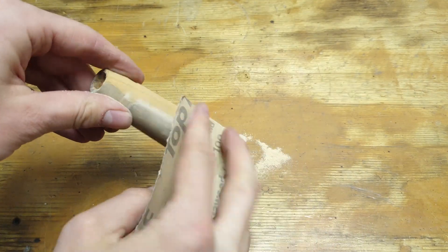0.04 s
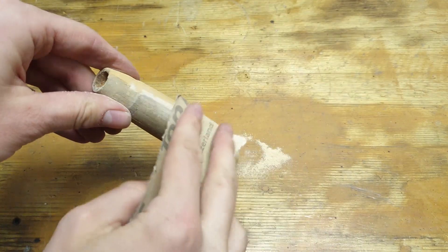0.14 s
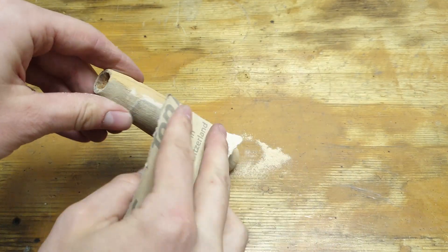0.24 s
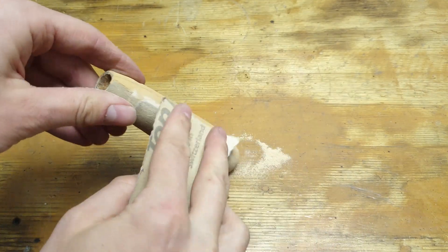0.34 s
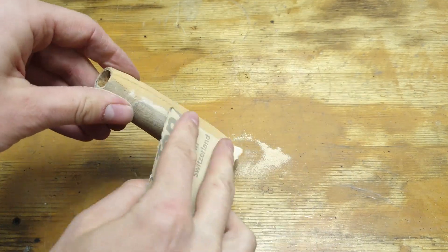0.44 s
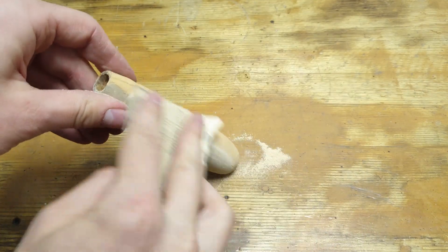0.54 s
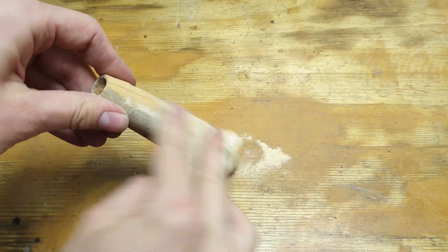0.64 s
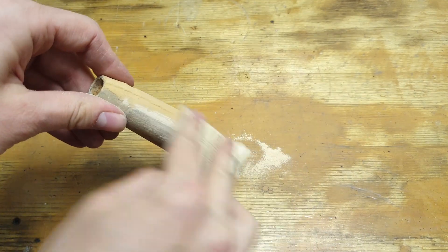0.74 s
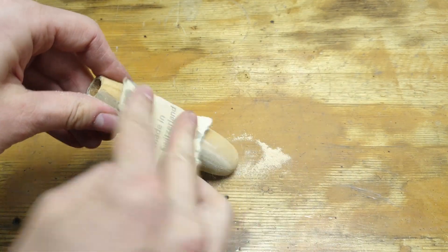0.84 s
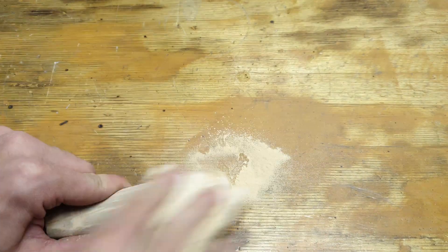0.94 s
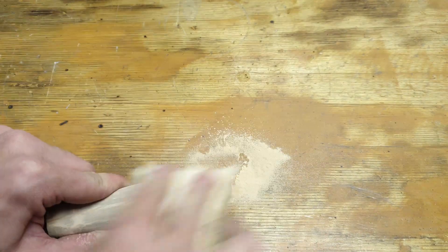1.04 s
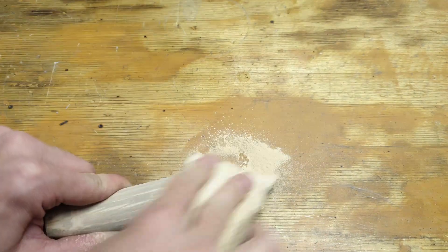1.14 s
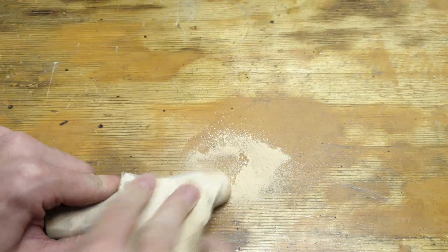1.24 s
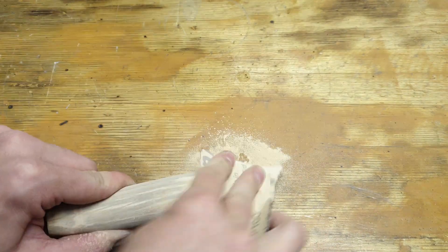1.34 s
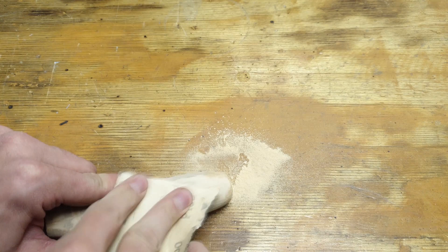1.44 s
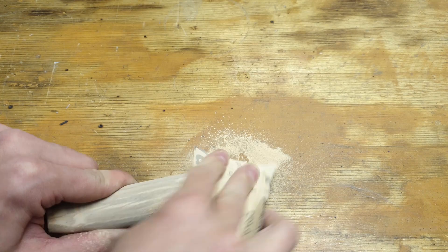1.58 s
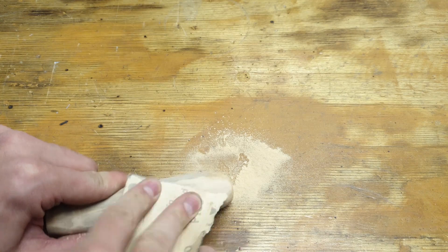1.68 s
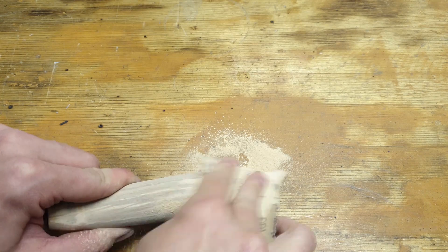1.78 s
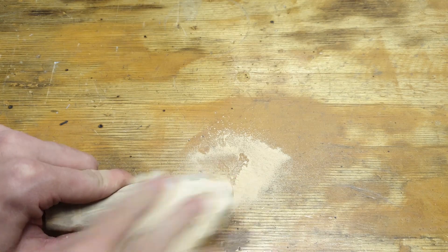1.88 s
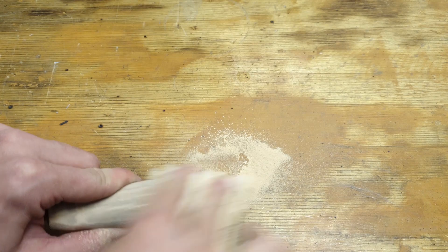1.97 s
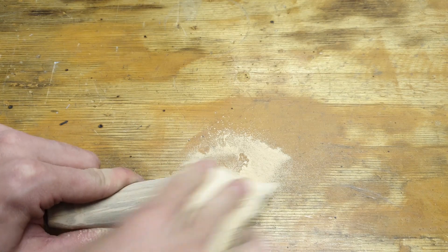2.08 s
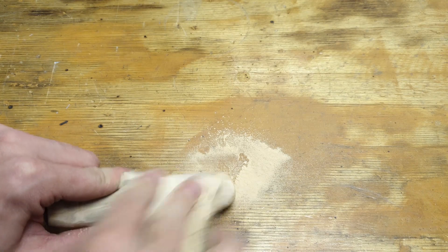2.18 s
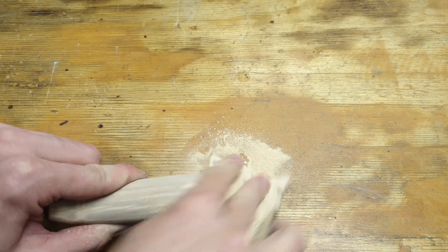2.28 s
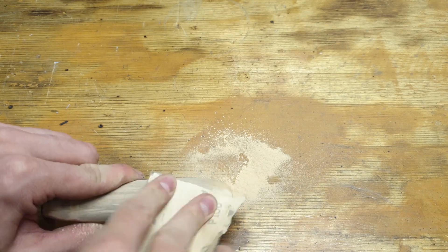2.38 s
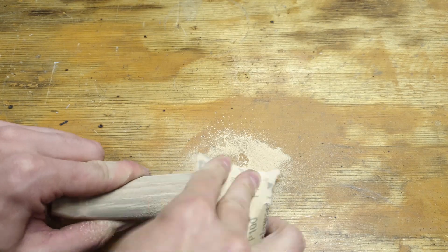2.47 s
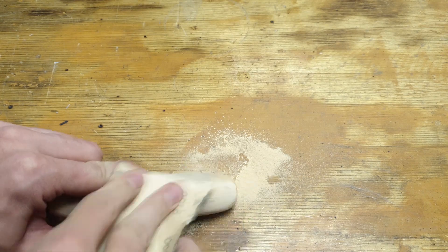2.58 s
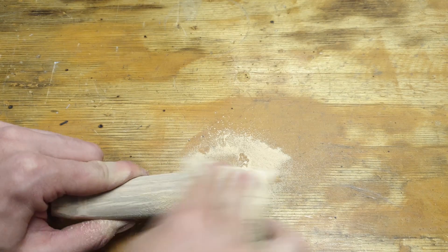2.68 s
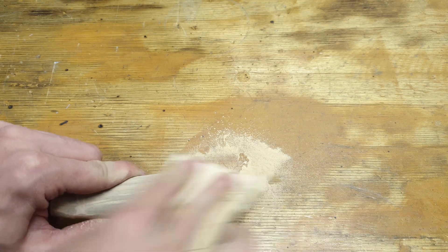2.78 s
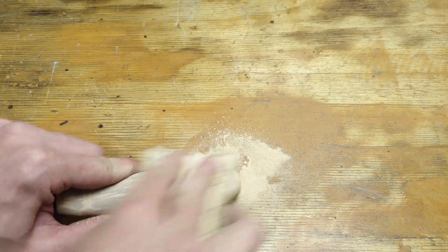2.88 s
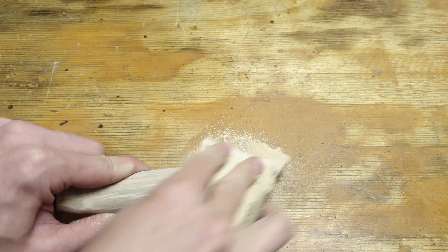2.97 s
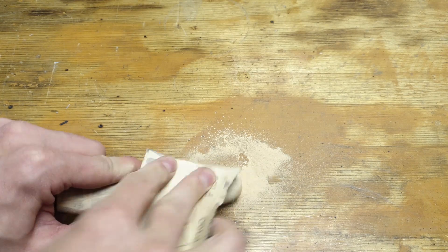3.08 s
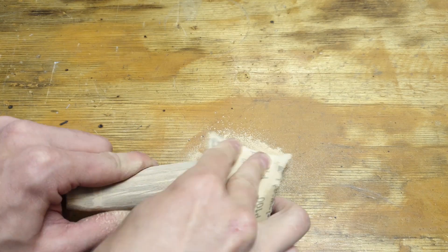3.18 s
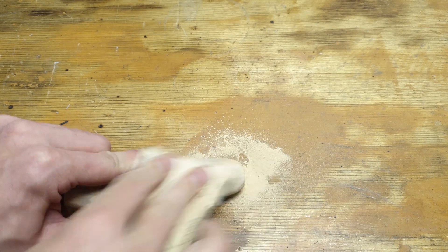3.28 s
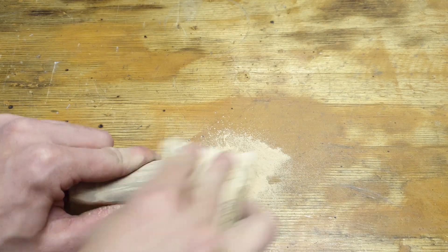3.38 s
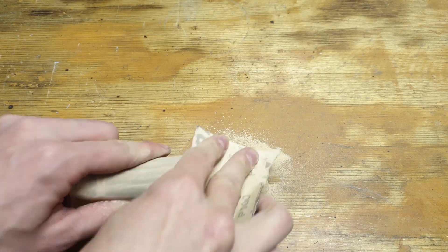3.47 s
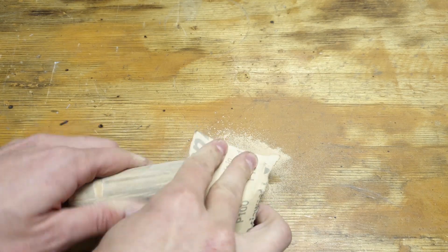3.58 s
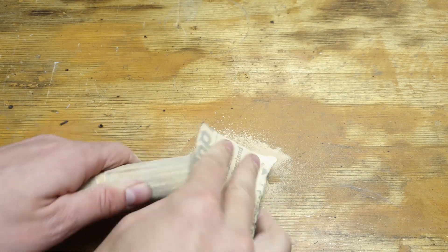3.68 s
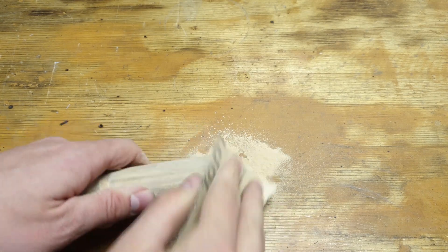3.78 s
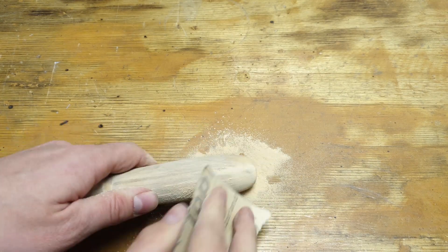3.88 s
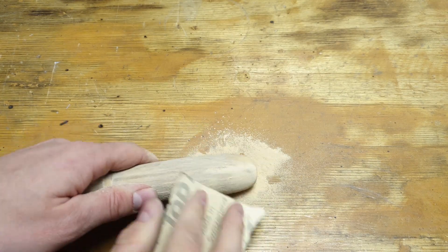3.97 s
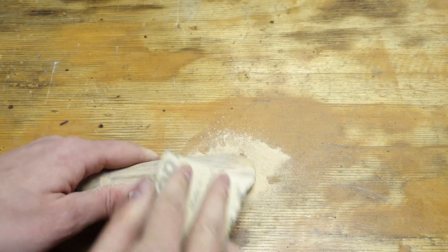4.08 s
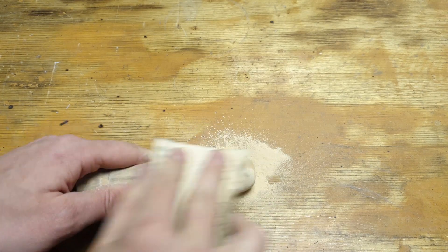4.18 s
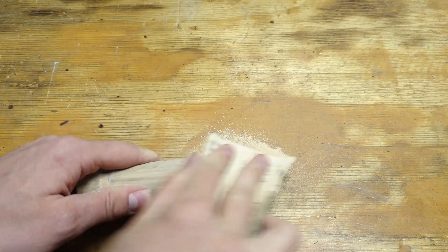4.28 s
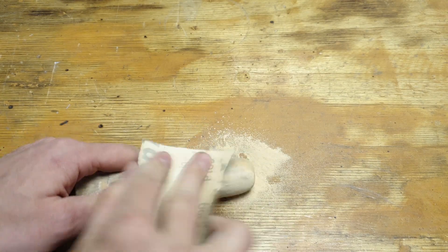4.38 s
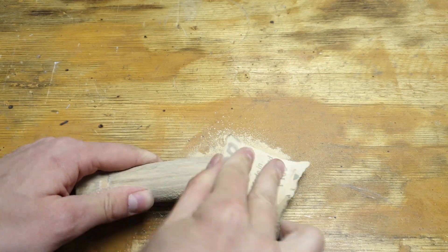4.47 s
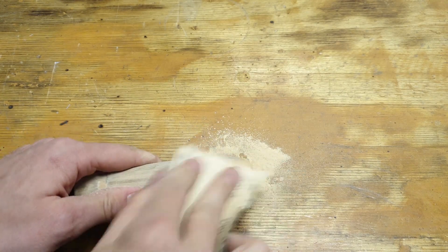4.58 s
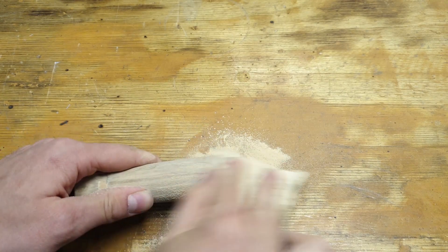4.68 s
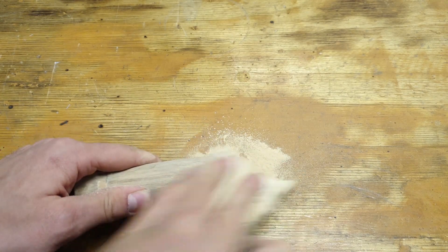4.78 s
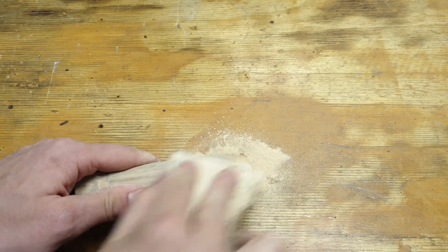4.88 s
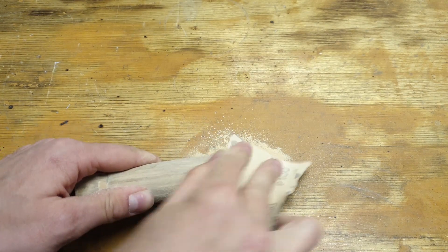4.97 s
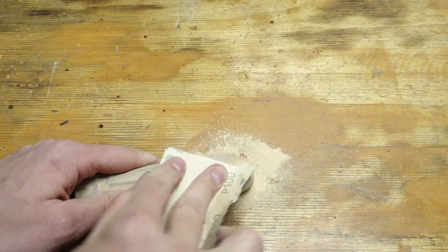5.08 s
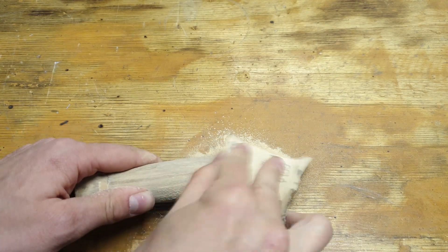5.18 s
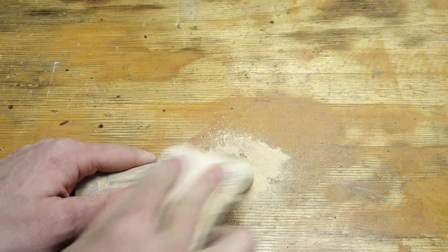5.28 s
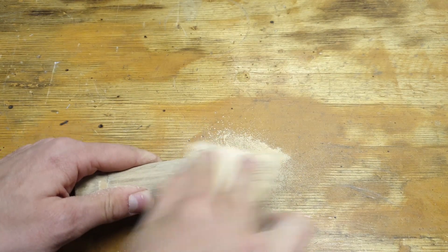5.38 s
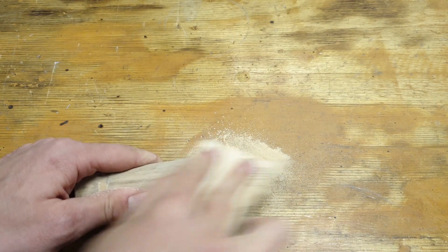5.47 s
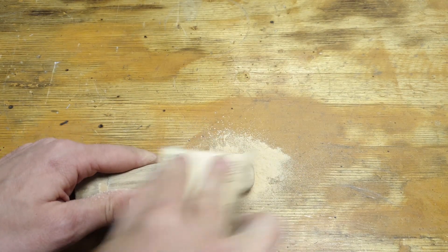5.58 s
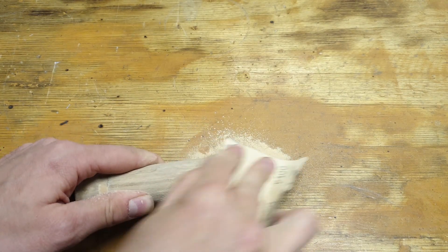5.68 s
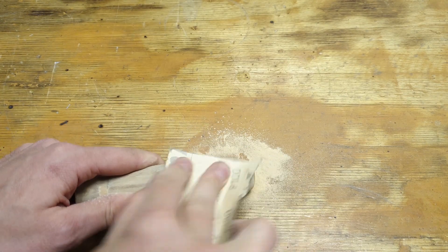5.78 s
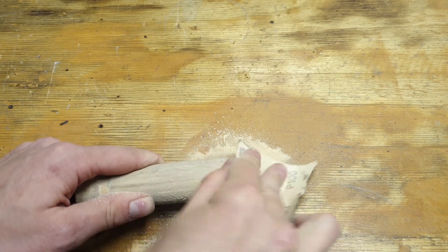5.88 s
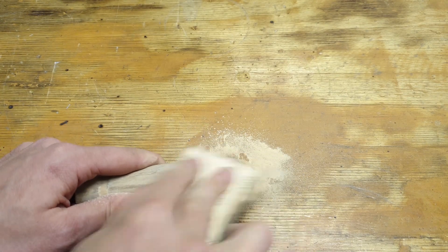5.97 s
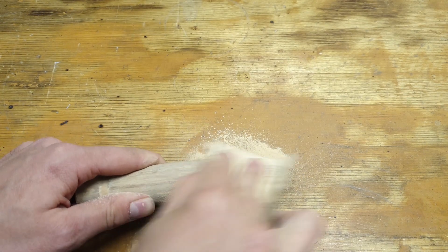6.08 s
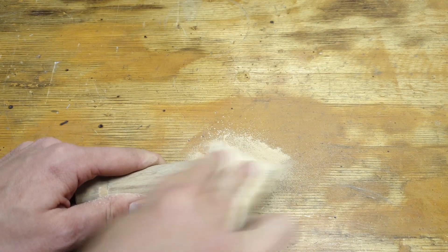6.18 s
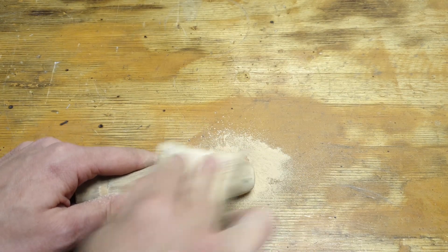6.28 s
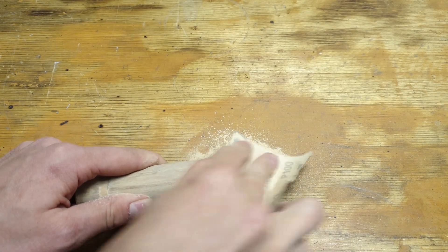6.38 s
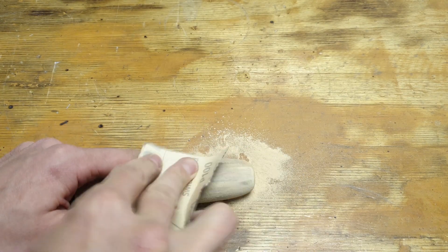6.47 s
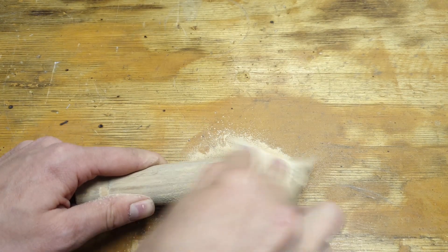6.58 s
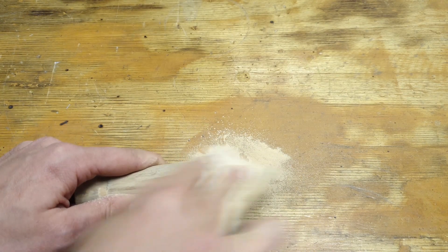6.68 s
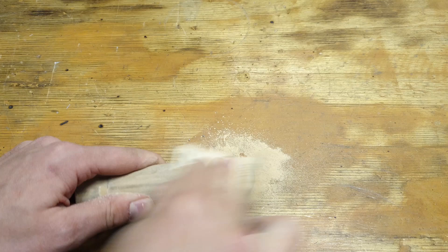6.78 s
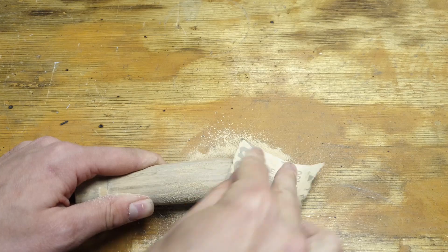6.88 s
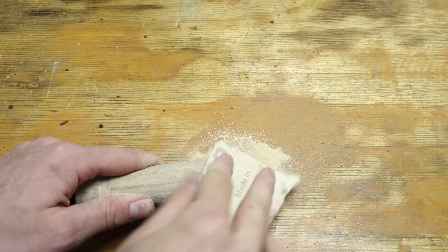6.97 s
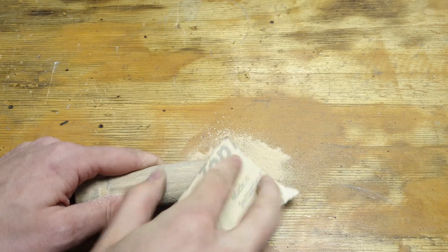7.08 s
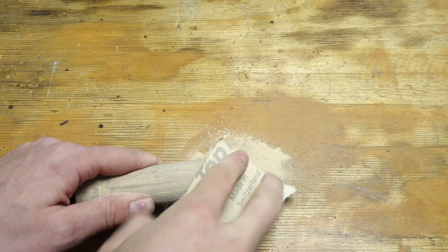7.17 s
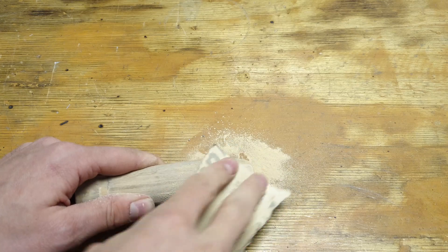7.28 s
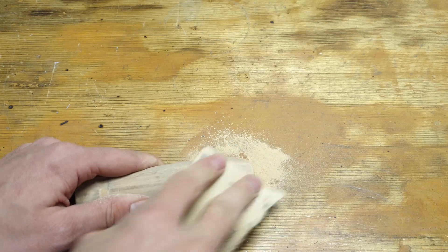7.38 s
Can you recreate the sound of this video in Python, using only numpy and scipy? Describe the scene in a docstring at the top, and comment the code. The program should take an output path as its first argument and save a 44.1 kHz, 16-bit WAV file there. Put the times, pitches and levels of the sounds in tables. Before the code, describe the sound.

Sandpaper rasps quickly back and forth over a hollow wooden handle on a workbench, with small wooden knocks, a brief pause, then more strokes.

```python
"""A wooden handle on a workbench is sanded by hand, back and forth, close by and to the left.
Shaped noise makes the scratching; it also drives resonances, so handle and bench top ring along.
Now and then the handle knocks on the bench: a short tone burst, a ring and close echoes.
Edge ticks are noise bursts, hand bumps are short low tones, and the rocking bench is low noise.
Steady sines and shaped noise make a faint mains hum and hiss that fill the pauses."""
import sys
import numpy as np
from scipy import signal
from scipy.fft import rfft, irfft, next_fast_len
from scipy.io import wavfile
from scipy.ndimage import uniform_filter1d

SR = 44100
rng = np.random.default_rng(int(sys.argv[2]) if len(sys.argv) > 2 else 0)


def to_wav(sig):
    """Store sig (one row per channel, or 1-D mono) as 16-bit WAV at the path in sys.argv[1].

    Samples outside -1..1 are clipped; the rate is SR.
    """
    pcm = np.clip(np.atleast_2d(sig), -1, 1) * 32767
    pcm = np.round(pcm).astype(np.int16)
    wavfile.write(sys.argv[1], SR, pcm.T)  # frames by channels


N = 328104  # samples


def amp(db):
    """Gain of a dB value."""
    return 10 ** (np.asarray(db) / 20)


def unit(x):
    """Scale x to an rms of 1."""
    return x / np.sqrt(np.mean(x ** 2) + 1e-20)


def along(points, hz):
    """Read a curve of (f/Hz, value) points on a log frequency axis."""
    f, value = np.transpose(points)
    return np.interp(np.log(hz + 1), np.log(f + 1), value)


def filtered(x, response):
    """Filter x by a complex response, given as a function of frequency."""
    size = next_fast_len(N + SR // 2)
    hz = np.fft.rfftfreq(size, 1 / SR)
    return irfft(rfft(x, size) * response(hz), size)[..., :N]


def colored(x, curve):
    """Shape noise by a curve of (f/Hz, level/dB per Hz) and bring it to rms 1."""
    return unit(filtered(x, lambda hz: amp(along(curve, hz))))


def modes(table):
    """Response of a body: a sum of resonances (f/Hz, width/Hz, level/dB) with alternating sign."""
    def response(hz):
        total = 0
        for k, (f, width, db) in enumerate(table):
            total = total + (-1) ** k * amp(db) * 1j * hz * width / (f * f - hz * hz + 1j * hz * width)
        return total
    return response


def ringing(drive, gain, table, states):
    """A body driven by grit; each way of holding it weights its resonances anew."""
    rows = np.array(table)
    total = 0
    for k, share in enumerate(states):
        body = modes(rows[:, [0, 1, k + 2]])
        total = total + filtered(drive * gain * share, body) / np.std(filtered(drive, body))
    return total


# how alike left and right are: (f/Hz, likeness 0 to 1)
LIKENESS = [(60, .9), (300, .87), (600, .7), (1200, .75), (2500, .55), (5000, .3), (12000, .2)]


def grit(grain_db, patchy_db):
    """Two partly alike streams of uneven tiny scratches; their colour shifts as the contact patch moves."""
    size = amp(grain_db * unit(uniform_filter1d(rng.standard_normal(N), size=24)))
    spectrum = signal.stft(size * rng.standard_normal((2, N)), nperseg=512)[2]
    patches = uniform_filter1d(rng.standard_normal(spectrum.shape[1:]), size=3, axis=0)
    patches = uniform_filter1d(patches, size=16, axis=1)
    pair = signal.istft(spectrum * amp(patchy_db * unit(patches)), nperseg=512)[1][:, :N]

    def mid_side(hz):
        turn = np.arccos(np.clip(along(LIKENESS, hz), -1, 1)) / 2
        return np.array([np.cos(turn), np.sin(turn)])
    mid, side = filtered(pair, mid_side)
    return np.array([mid + side, mid - side])


# mains hum before the left-right trim: (f/Hz, peak level/dB)
HUM_TONES = [(100, -85), (200, -90.5)]
# colour of the hiss: (f/Hz, relative level/dB per Hz)
HISS_COLOR = [(30, -13), (300, -0.5), (1000, -6), (4000, -9), (16000, -9)]


def background():
    """Mains hum as steady sines, and a faint hiss as shaped noise."""
    t = np.arange(N) / SR
    hum = sum(amp(db) * np.sin(2 * np.pi * hz * t) for hz, db in HUM_TONES)
    hiss = amp(-85.0) * colored(rng.standard_normal((2, N)), HISS_COLOR)
    return hum * amp([[1.5], [-3]]) + hiss


# how strongly the bench rocks under the hands, before trims: (t/s, level/dB)
ROCKING_LEVEL = [(0, -88), (.8, -92), (1.1, -70), (3.45, -70.5), (3.75, -81.5), (4.15, -88.5), (4.5, -73),
                 (5.2, -68.5), (5.7, -76), (6.85, -71), (7.1, -85)]
# colour of the rocking: (f/Hz, relative level/dB per Hz)
RUMBLE_COLOR = [(15, -30.5), (35, -18.5), (62, -5), (100, -9.5), (160, -11), (250, -27)]


def rocking():
    """The bench rocks under the hands: low rumbling noise that swells and fades."""
    level_db = np.interp(np.arange(N) / SR, *np.transpose(ROCKING_LEVEL)) + 4.0
    return amp(level_db) * colored(grit(6.1, 4.1), RUMBLE_COLOR) * amp([[2.5], [-4]])


# strokes, pushes and pulls in turn, a push first in each grip; each ends by the next start:
# (start t/s, scratch level/dB at full speed before trims, t/s from start to full speed,
#  t/s from start to braking, which never comes before full speed)
STROKES_TABLE = [(0.532, -51.5, 0.098, 0.087), (0.653, -40, 0.07, 0.096), (0.787, -38, 0.076, 0.082),
                 (0.908, -33.5, 0.09, 0.11), (1.057, -36.5, 0.026, 0.082), (1.175, -37.5, 0.031, 0.083),
                 (1.293, -38, 0.022, 0.077), (1.406, -36, 0.061, 0.08), (1.525, -38, 0.026, 0.073),
                 (1.636, -36.5, 0.065, 0.074), (1.743, -38.5, 0.034, 0.084), (1.861, -35.5, 0.062, 0.083),
                 (1.984, -37, 0.032, 0.072), (2.099, -35, 0.062, 0.073), (2.211, -36.5, 0.038, 0.085),
                 (2.335, -35, 0.043, 0.068), (2.462, -41.5, 0.018, 0.048), (2.544, -37, 0.078, 0.082),
                 (2.666, -37.5, 0.023, 0.073), (2.776, -38.5, 0.068, 0.083), (2.899, -40, 0.025, 0.071),
                 (3.013, -43, 0.079, 0.09), (3.143, -40.5, 0.028, 0.061), (3.245, -40, 0.075, 0.087),
                 (3.375, -39.5, 0.036, 0.069), (4.213, -43, 0.034, 0.068), (4.311, -39, 0.06, 0.074),
                 (4.423, -40, 0.042, 0.083), (4.546, -45.5, 0.059, 0.092), (4.668, -40, 0.019, 0.066),
                 (4.779, -38.5, 0.059, 0.089), (4.905, -38.5, 0.047, 0.074), (5.021, -40, 0.069, 0.09),
                 (5.144, -37.5, 0.028, 0.068), (5.252, -35.5, 0.07, 0.073), (5.373, -33, 0.021, 0.061),
                 (5.484, -38, 0.073, 0.077), (5.599, -39, 0.041, 0.076), (5.71, -41.5, 0.073, 0.078),
                 (5.831, -40.5, 0.026, 0.071), (5.945, -42.5, 0.07, 0.087), (6.07, -42, 0.023, 0.068),
                 (6.181, -43, 0.058, 0.085), (6.3, -39, 0.041, 0.077), (6.419, -37.5, 0.078, 0.083),
                 (6.543, -38.5, 0.016, 0.08), (6.665, -37, 0.071, 0.081), (6.799, -39.5, 0.023, 0.061),
                 (7.408, -46, 0.025, 0.029)]
# light drags while the hands shift between bouts, one list each:
# (t/s, scratch level/dB before trims, handle drive level/dB relative to it)
LIGHT_DRAGS = [
    [(0.0, -74, 4.5), (0.052, -73.5, 1.5), (0.134, -72, -23), (0.156, -87, -17), (0.232, -82, -5),
     (0.238, -75.5, -5), (0.28, -93, -6)],
    [(0.36, -86, 2), (0.412, -76, -14), (0.416, -74.5, -6), (0.48, -64.5, 2), (0.51, -76, -5),
     (0.536, -68, 2.5), (0.55, -69, 3)],
    [(3.46, -61, -16), (3.504, -70.5, -20), (3.564, -78, -22), (3.574, -55.5, -15), (3.606, -71, -1),
     (3.626, -79, -8), (3.73, -65, -4)],
    [(3.733, -69, 0), (3.755, -57.5, 5), (3.817, -64, 0.5), (3.849, -81.5, 2), (3.923, -90, 0),
     (3.987, -71.5, 2), (4.03, -87.5, -3)],
    [(4.166, -81, 4), (4.174, -77.5, 12), (4.23, -51, -4)],
    [(6.88, -64, 12), (6.908, -71, -2), (6.944, -52.5, 2), (7.0, -60.5, 6), (7.018, -59.5, 0),
     (7.058, -68.5, 9.5), (7.085, -76, -2)],
    [(7.085, -77, -4), (7.109, -64, -3.5), (7.231, -67, -1), (7.259, -72, -1.5), (7.367, -60.5, 2),
     (7.401, -72.5, 5), (7.42, -55.5, -17)],
]
# how hard the handle is pressed on the bench: (t/s, bench drive level/dB)
LEAN_LEVEL = [(.5, -5.5), (1.2, 1.5), (2, -0.5), (2.9, 3), (3.6, -1.5), (4.3, -4.5), (5, 0.5), (5.9, 1.5),
              (6.6, -2), (7.4, -2)]
# when the paper has broken loose; it then gains speed more slowly:
# a row per grip: (t/s from a push's start, t/s from a pull's start)
SLIP_TIME = [(.013, .012), (.0105, .012)]
# level at that moment, relative to full speed; a row per grip: (push level/dB, pull level/dB)
SLIP_LEVEL = [(-3.5, -7), (-3.5, -9)]
REGRIP_S = 3.6  # the second grip begins
LIFT_S = .16  # after so long without a new stroke the paper has lifted
CREEP_S, CREEP = .004, .15  # the paper creeps first: time in s, share of the slip's dB step
BRAKE_DB = (-4.5, -4)  # level where braking begins, relative to full speed: push, pull
STOP_S = (0.026, 0.018)  # time to come almost to rest: push, pull
TURN_DB = (-15.5, -19)  # level at the turn before a push, before a pull, relative to full speed
# base drive relative to the scratch: (push, pull) in the first grip, then in the second
HANDLE_DB, BENCH_DB = [(-10.5, -8.5), (-3.5, -4)], [(-20, -20), (-16, -16.5)]
# each dB a stroke is below FULL_DB adds so many dB of handle and bench drive; above it, takes them off
FULL_DB, WOODIER, BOOMIER = -38, 0.35, 0.3
WOOD_SWING = 0.83  # share of the scratch's swing in dB that the handle follows
REACH_DB = (-1, 2.5)  # extra handle drive at a push's end, less at its start: first, second grip
LIGHT_BENCH_DB = -9.5  # bench drive of a light drag, relative to its scratch


def motion():
    """Follow the paper: dB of scratch, handle drive and bench drive, and the end it is at (0 to 1)."""
    start, full_db, after, braking = np.transpose(STROKES_TABLE)
    t, second = np.arange(N) / SR, (start > REGRIP_S).astype(int)
    pull = (np.arange(len(start)) - np.argmax(second) * second) % 2
    scratch, wood, top = np.full((3, N), 1e-7)
    ends = np.minimum(np.append(start[1:], np.inf), start + LIFT_S)
    for s, end, db, peak, brake, p, grip in zip(start, ends, full_db, after, braking, pull, second):
        slip_db = SLIP_LEVEL[grip][p]
        creep_db = TURN_DB[p] + CREEP * (slip_db - TURN_DB[p])
        lifted = end - s >= LIFT_S - 1e-9
        next_db = TURN_DB[1 - p]
        # turn, creep, slip, full speed, braking, almost at rest, end
        times = [s, s + CREEP_S, s + SLIP_TIME[grip][p], s + peak, s + brake, s + brake + STOP_S[p], end]
        times = np.maximum.accumulate(np.minimum(times, end))
        levels = [TURN_DB[p], creep_db, slip_db, 0, BRAKE_DB[p], next_db + 0.5, next_db - 30 * lifted]
        shape_db = np.interp(t, times, levels, -200, -200)
        gain = amp(db + shape_db)
        reach_db = (1 - 2 * p) * REACH_DB[grip] * np.interp(t, [s, s + brake], [-1, 1])
        swing_db = (WOOD_SWING - 1) * np.maximum(shape_db, -30)
        weaker_db = FULL_DB - db
        scratch = scratch + gain
        wood = wood + gain * amp(HANDLE_DB[grip][p] + reach_db + WOODIER * weaker_db + swing_db)
        top = top + gain * amp(BENCH_DB[grip][p] + BOOMIER * weaker_db)
    for rows in LIGHT_DRAGS:
        s, db, handle_db = np.transpose(rows)
        gain = amp(np.interp(t, s, db, -200, -200))
        scratch = scratch + gain
        wood = wood + gain * amp(np.interp(t, s, handle_db))
        top = top + gain * amp(LIGHT_BENCH_DB)
    level, handle, bench = 20 * np.log10([scratch, wood, top])
    bench = bench + np.interp(t, *np.transpose(LEAN_LEVEL))
    return uniform_filter1d(level, size=60), handle, bench, np.interp(t, start, pull)


# handle resonances, levels relative to each other:
# (f/Hz, width/Hz, level/dB in the first grip, level/dB in the second, level/dB under a light touch)
HANDLE_MODES = [(1027, 87, 2.5, -0.5, 4), (1348, 253, 0, -5, -0.5), (1667, 65, 6, -1.5, 7),
                (1983, 243, 1.5, -4.5, 0), (2480, 276, 1, -2, -36), (3083, 390, -5.5, -5.5, -13),
                (4100, 390, -24.5, -6.5, -22)]
# bench top resonances, levels relative to each other:
# (f/Hz, width/Hz, level/dB in the first grip, level/dB in the second)
BENCH_MODES = [(203.6, 44, -13, -13), (306, 16.2, 0.5, 2), (367.4, 23.8, -1, -0.5), (463.3, 44.6, -2, -3),
               (687, 79, -0.5, -2), (882, 18.4, 3, 5)]
# colour of the duller scratch: (f/Hz, relative level/dB per Hz)
COARSE_COLOR = [(600, -34), (1500, -11.5), (2600, -3), (3700, 0.5), (4800, 0.5), (5500, 0), (7400, -1.5),
                (8300, -37), (10000, -61)]
# colour of the finest grit: (f/Hz, relative level/dB per Hz)
FINE_COLOR = [(5000, -50), (7500, -1.5), (8500, -5), (11800, -1.5), (15000, -7.5), (16500, -18.5)]
# band cancelled by the bench's reflection, where pulls start and where pushes start:
# (f/Hz, width/Hz, level/dB of the part taken out)
REFLECTION_DIPS = [(3760, 170, -3), (3866, 450, -8)]
PATCHY_DB = 2.6  # how far the colour of the grit drifts


def sanding():
    """Grit heard directly and through the ringing handle and bench top, with the edge ticks."""
    level, handle_db, bench_db, place = motion()
    first = np.arange(N) / SR < REGRIP_S
    # faster sliding sounds brighter
    bright = 0.16 * (np.maximum(level, -60) + 36.5) + np.where(first, 2, -1.5)
    coarse = amp(level - bright / 2 + 1.5) * colored(grit(1.0, PATCHY_DB), COARSE_COLOR)
    fine = amp(level + bright / 2 + 0.5) * colored(grit(1.3, PATCHY_DB), FINE_COLOR)

    # with little pressure the handle rings more freely
    effort_db = 20 * np.log10(uniform_filter1d(amp(level), size=5000))
    light = np.clip((-56.5 - effort_db) / 6, 0, 1)
    holds = [first * (1 - light), ~first * (1 - light), light]
    wood = ringing(grit(1.5, PATCHY_DB), amp(handle_db + 2.0), HANDLE_MODES, holds)

    # the bench follows the slower pressure of the hand
    press = uniform_filter1d(amp(bench_db), size=3000)
    top = ringing(grit(2.4, 2.8), amp(5.5) * press, BENCH_MODES, [first, ~first])

    near = coarse + fine + wood
    # the cancelled band moves with the paper: a blend of the dips at the two ends
    cancelled = 0
    for share, dip in zip((place, 1 - place), REFLECTION_DIPS):
        cancelled = cancelled + share * filtered(near, modes([dip]))
    # faint rubs come from the holding hand, further left
    pan_db = 3.0 - .13 * (uniform_filter1d(level, size=1500) + 42.5)
    return (near - cancelled + top + ticks()) * amp([pan_db / 2 - 1.2, -pan_db / 2 - 1.2])


# handle against bench: (t/s, level/dB of the blow before trims, f/Hz of the blow,
#  bench drive level/dB relative to the blow before a fixed boost)
KNOCK_TABLE = [(0.334, -66.5, 1460, -6.5), (0.984, -17.5, 1560, -18.5), (1.177, -22.5, 1420, -46),
               (1.225, -17, 1490, -20.5), (1.409, -30, 1370, -22), (1.459, -15.5, 1540, -22),
               (1.894, -24, 1430, -20), (2.099, -35.5, 1410, -13.5), (2.139, -21, 1430, -18.5),
               (2.385, -32, 1500, -13.5), (2.815, -29, 1400, -19), (3.015, -37, 1360, -14),
               (3.063, -29.5, 1340, -17.5), (5.962, -10, 1676, -71)]
# echoes from nearby surfaces: (delay t/s on the left, level/dB before a fixed boost)
ECHO_TABLE = [(.0032, -17), (.0058, -11), (.0092, -16), (.0125, -18), (.0152, -19), (.018, -19),
              (.023, -19), (.031, -19)]


def knocks():
    """A blow of two or three cycles, the ring of handle and bench after it, and close echoes."""
    air, blows, jolts = np.zeros(N + SR), np.zeros(N), np.zeros(N)
    t = np.arange(SR // 100) / SR
    swell = (t / 0.0006) ** 2 * np.exp(2 - 2 * t / 0.00063)  # the contact lasts about a millisecond
    for s, db, hz, bench_db in KNOCK_TABLE:
        at = round(s * SR)
        tone = np.sin(2 * np.pi * hz * t) + amp(-17.5) * np.sin(2 * np.pi * 4300 * t)
        air[at:][:len(t)] += -amp(db) * swell * tone
        blows[at + 20] = amp(db + 1.0)
        jolts[at + 20] = amp(db + bench_db + 44.0)
    air = air[:N]
    handle = modes(np.array(HANDLE_MODES)[:, :3])
    bench = modes(np.array(BENCH_MODES)[:, :3])
    # the blow drives the handle's higher resonances less
    ring = filtered(blows, lambda hz: handle(hz) / (1 + 1j * hz / 1500) ** 2) + filtered(jolts, bench)

    def echoes(hz):
        stretch = np.array([[1], [1.04]])  # the right hears each echo a little later
        return sum(amp(db) * np.exp(-2j * np.pi * hz * s * stretch) for s, db in ECHO_TABLE)
    both = (air + ring) * amp([[1.2], [-1.2]]) + filtered(air, echoes) * amp(1.5)
    return filtered(both, lambda hz: (hz / (hz - 200j)) ** 2)  # so small a body radiates no deep bass


# the paper's edge catches: (t/s, level/dB before trims)
TICK_TABLE = [(0.335, -65.5), (3.573, -48), (4.1725, -65), (7.012, -41)]


def ticks():
    """The paper's edge catches: noise bursts with a sharp front that fade 60 dB in 69 ms."""
    out, t = np.zeros((2, N + SR)), np.arange(SR // 10) / SR
    for s, db in TICK_TABLE:
        burst = amp(db - 7.5 - 60 * t / 0.069) * rng.standard_normal((2, len(t)))
        out[:, round(s * SR):][:, :len(t)] += burst
    return filtered(out[:, :N], lambda hz: hz / (hz - 900j))  # less bass


# soft bumps of the hand on the bench: (t/s, level/dB before trims, f/Hz)
THUMP_TABLE = [(4.417, -46.5, 193), (5.164, -59, 110), (7.22, -74.5, 98)]


def thumps():
    """The hand bumps the bench: two or three soft low cycles that swell and die away."""
    out, t = np.zeros(N + SR), np.arange(SR // 10) / SR
    for s, db, hz in THUMP_TABLE:
        swell = (t * hz / 1.1) ** 2 * np.exp(2 - 2 * t * hz / 1.42)
        out[round(s * SR):][:len(t)] += amp(db) * swell * np.sin(2 * np.pi * hz * t)
    return out[:N] * amp([[1.5], [-4]])


# how much louder the left is: (f/Hz, left over right level/dB)
LEFT_BALANCE = [(100, 4.5), (290, 9.5), (640, 3), (1400, 5), (3100, -1), (6800, 1.5), (15000, 7)]
# how far the left leads the right: (f/Hz, phase/radians)
LEFT_LEAD = [(100, -1), (1000, 1.5), (2400, 1), (5000, 2.5), (15000, 0.5)]


def scene():
    """All sources at two microphones, the left one nearer; hum and hiss are added after that."""
    def ears(hz):
        left = amp(along(LEFT_BALANCE, hz) / 2) * np.exp(.5j * along(LEFT_LEAD, hz))
        return np.array([left, 1 / left])
    quiet = background()
    return filtered(rocking() + sanding() + knocks() + thumps(), ears) + quiet


def record(dry):
    """The microphones' band limit: nothing is kept from 15950 Hz up."""
    return filtered(dry, lambda hz: hz < 15950)


dry = scene()
out = record(dry)
to_wav(out)
```